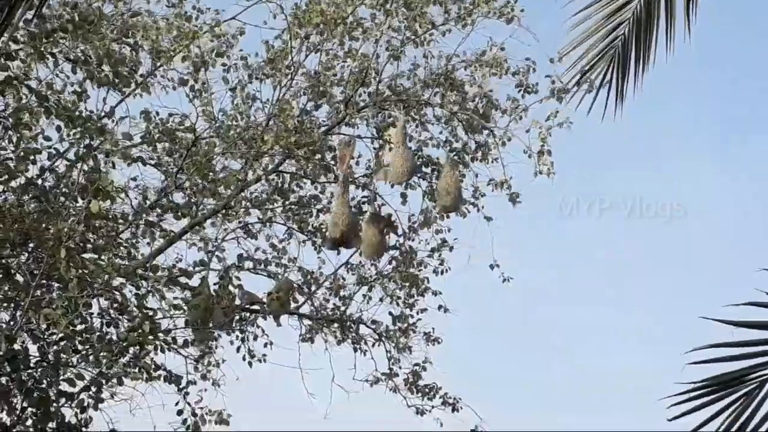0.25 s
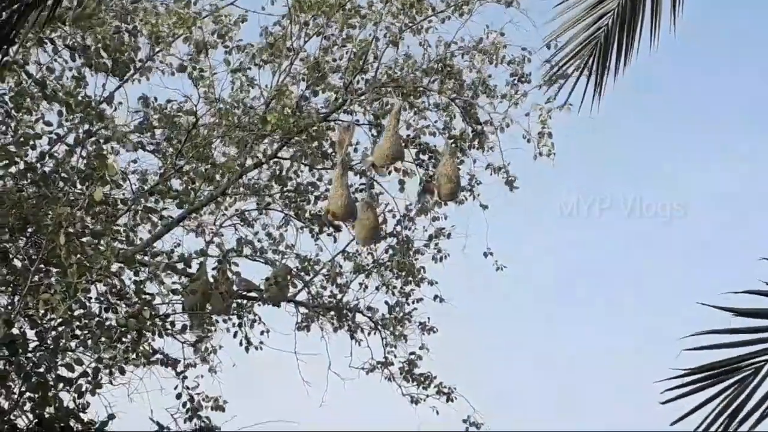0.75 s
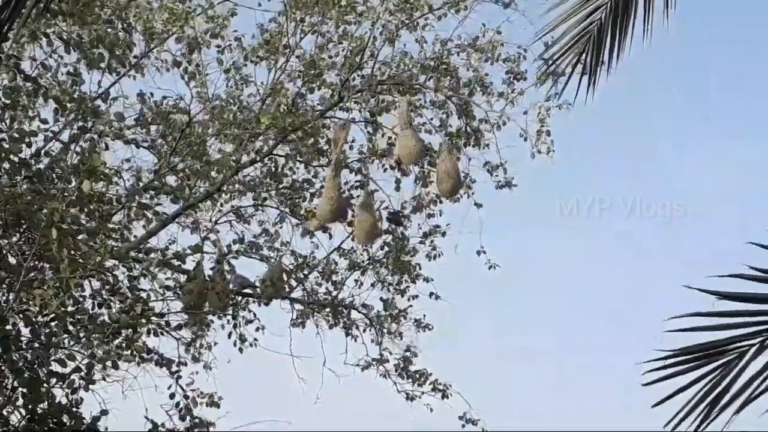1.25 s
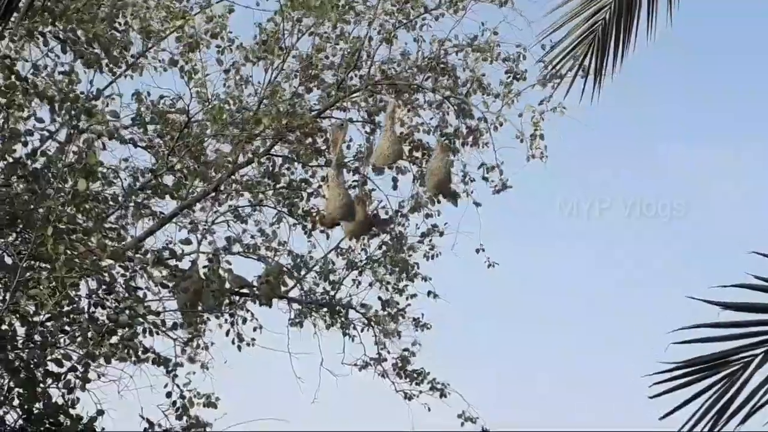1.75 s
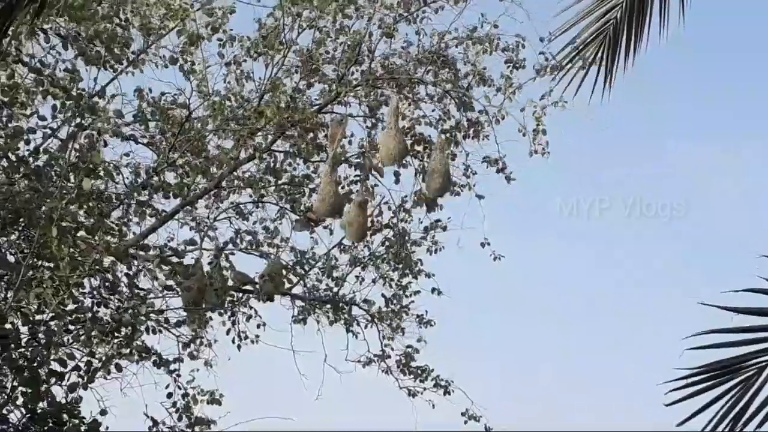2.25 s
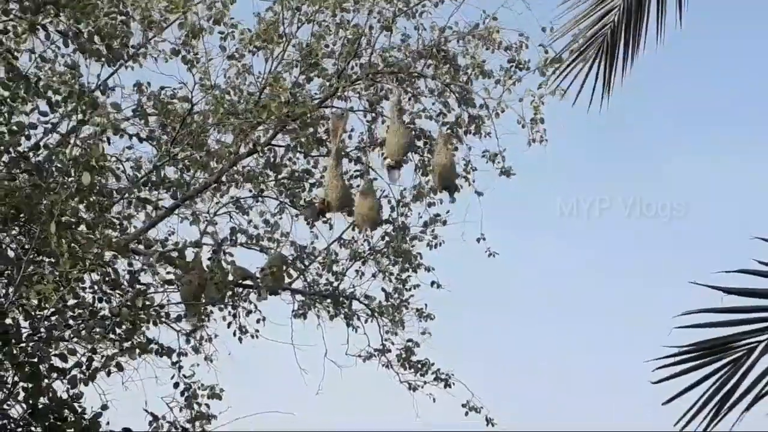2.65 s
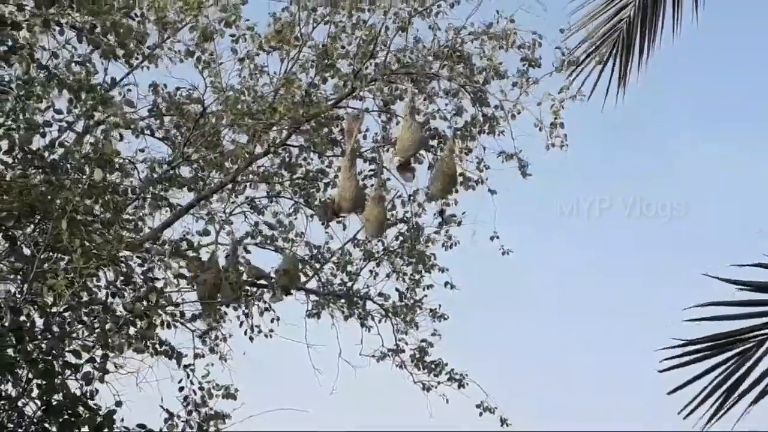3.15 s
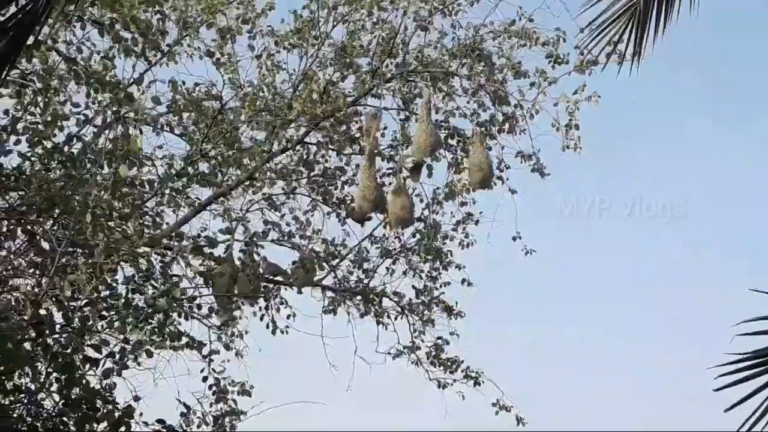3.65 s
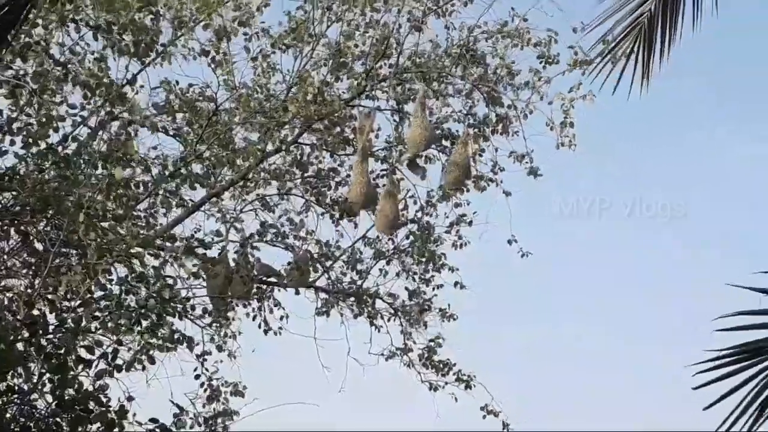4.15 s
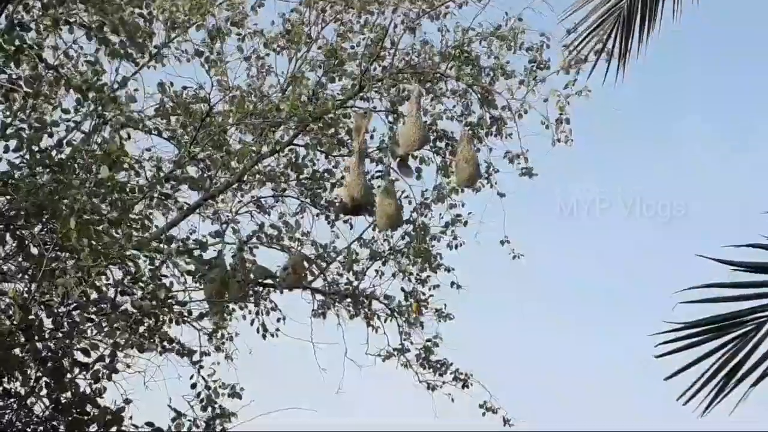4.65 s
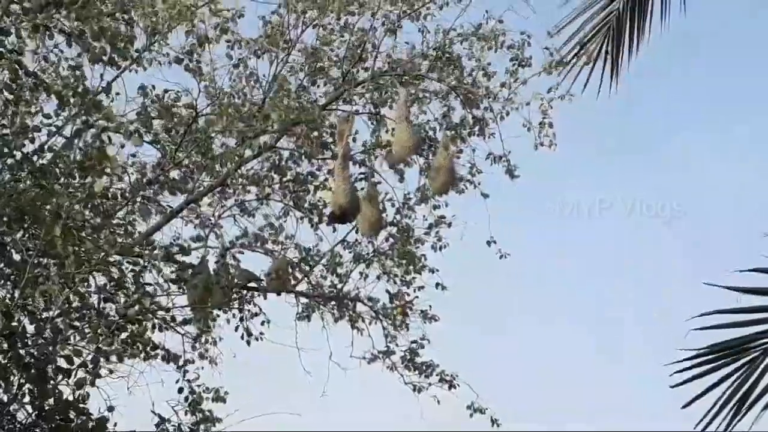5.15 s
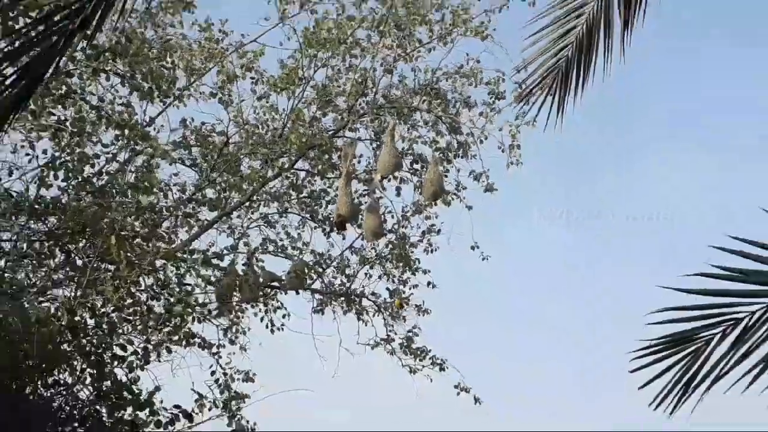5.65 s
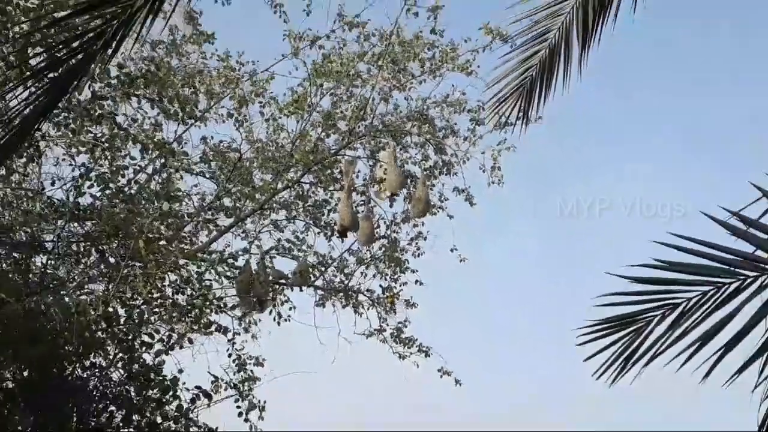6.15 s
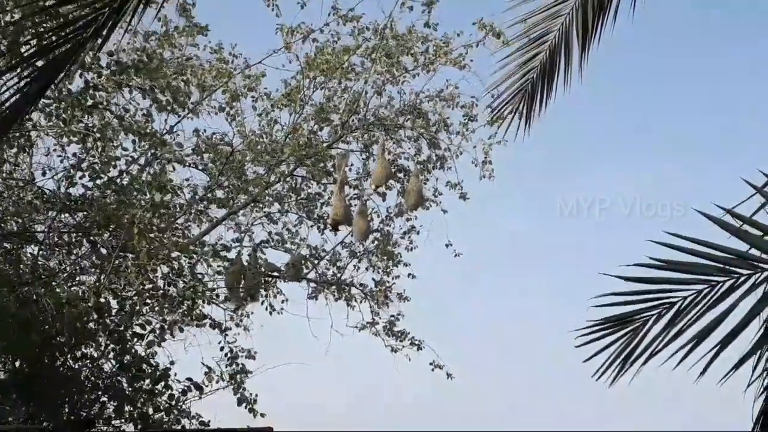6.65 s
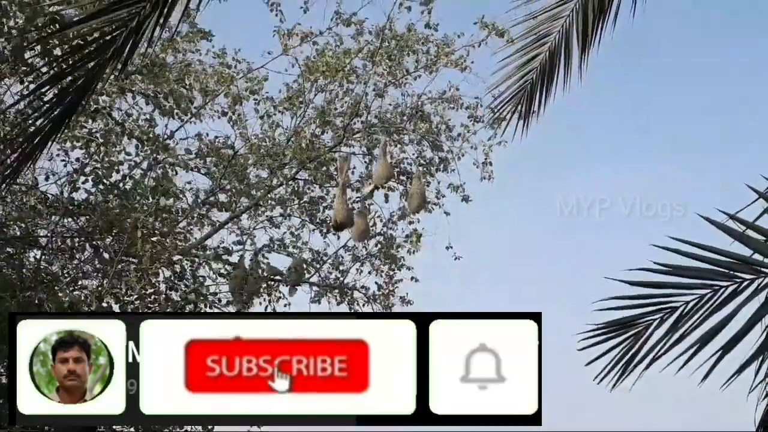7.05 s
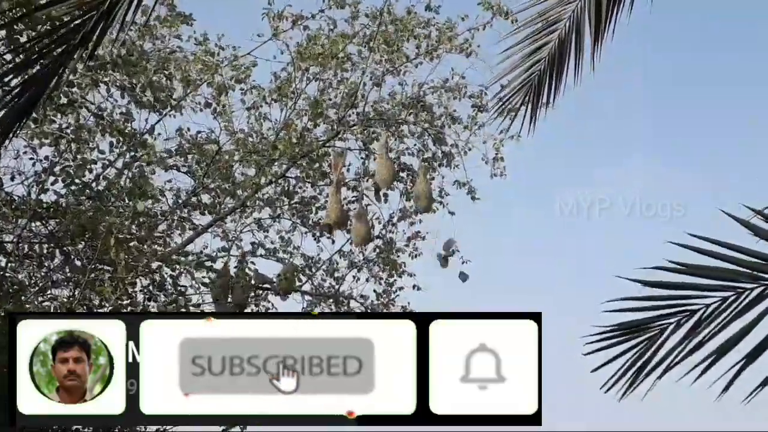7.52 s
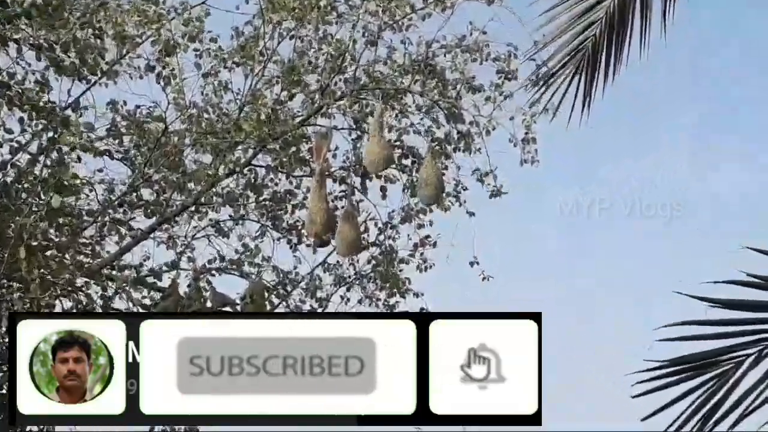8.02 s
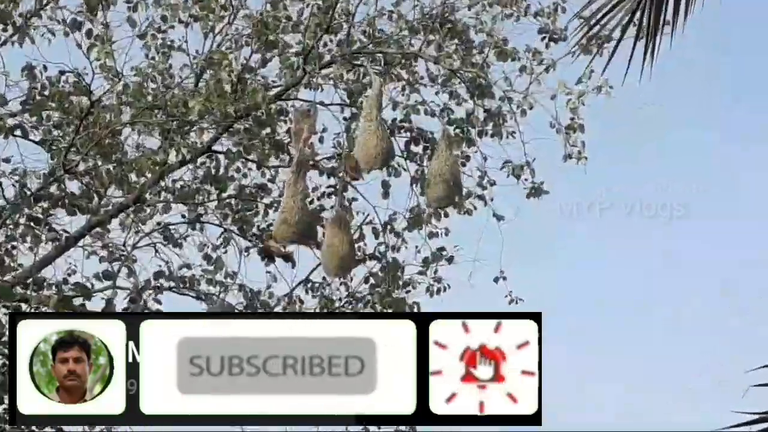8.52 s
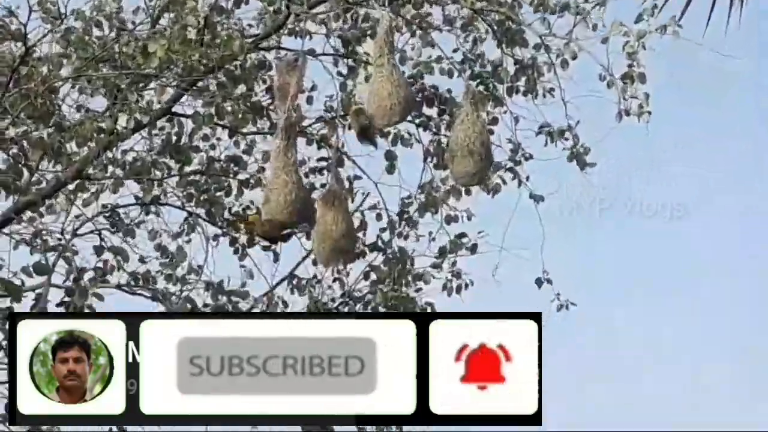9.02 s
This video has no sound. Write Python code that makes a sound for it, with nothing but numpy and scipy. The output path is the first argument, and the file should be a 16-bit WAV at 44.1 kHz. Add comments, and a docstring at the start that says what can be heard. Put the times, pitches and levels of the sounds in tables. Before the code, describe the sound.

A weaver bird colony chatters loudly and shrilly in its nest tree, with warbled trills sliding downward, while wind rumbles in gusts against the microphone.

```python
"""Weaver birds chatter in their nest tree, heard in mono: near birds repeat a warbled trill and a buzzy
downward slide over a crowd of overlapping notes, with rasps, early gusts, far toots and a chugging engine.
A long whistle falls near 4 s, the hardest gusts hit near 5 s, and a second whistle follows.
A thin buzz holds from about 6 s, a soft rush swells at 7 s, and four quick chips come near 8 s.
Bird notes are wobbling tones with leaf echoes, the rest is tones, shaped noise and pulses; loud peaks round off."""
import sys
import numpy as np
from scipy import signal
from scipy.fft import rfft, irfft
from scipy.io import wavfile
from scipy.ndimage import uniform_filter1d

SR = 44100
rng = np.random.default_rng(int(sys.argv[2]) if len(sys.argv) > 2 else 0)


def bounce(signal):
    """Save signal as a 16-bit WAV file at the path given by the first command-line argument."""
    frames = np.transpose(np.atleast_2d(signal))
    limited = np.clip(frames, -1, 1)
    pcm = np.round(limited * 32767).astype(np.int16)
    wavfile.write(sys.argv[1], SR, pcm)


N = 409248
TIME = np.arange(N) / SR

# song phrases, each a trill that runs into a downward slide; levels are before the trims in near_birds:
# turn_s (from trill to slide), trill_length_s, trill_pitch_hz, trill_level_db,
# slide_length_s, slide_top_hz, resting_hz, slide_level_db
PHRASES = [(0.127, 0.165, 4600, -7, 0.15, 6020, 3390, -14),
           (0.325, 0.045, 4500, -16, 0.15, 5680, 3112, -15),
           (0.439, 0.12, 4806, -7.5, 0.14, 6360, 3264, -14),
           (0.642, 0.15, 4530, -10.5, 0.091, 5700, 3244, -13),
           (0.779, 0.071, 4914, -11, 0.13, 5260, 3240, -15),
           (0.885, 0.17, 4624, -11, 0.13, 6120, 3210, -14.5),
           (1.207, 0.05, 4812, -12.5, .17, 5850, 3226, -13.5),
           (1.326, 0.15, 4610, -10.5, .11, 5830, 3115, -10.5),
           (1.564, 0.09, 4510, -11, .125, 5760, 3436, -10.5),
           (1.684, 0.1, 4920, -15.5, 0.17, 5660, 3118, -15.5),
           (1.759, 0.097, 4603, -7.5, 0.14, 6190, 3110, -12),
           (1.931, .11, 4600, -16, 0.15, 4880, 3420, -33),
           (2.088, 0.14, 4570, -10.5, 0.12, 5940, 3430, -12),
           (2.205, 0.13, 4710, -11, 0.14, 6430, 3180, -18),
           (2.64, 0.11, 4470, -19, 0.14, 5140, 3080, -15.5),
           (3.112, 0.028, 4724, -24, 0.13, 5020, 3135, -14),
           (3.274, 0.19, 4860, -9.5, 0.17, 6140, 3298, -10),
           (3.598, 0.13, 4690, -18, 0.13, 4810, 3190, -17.5),
           (3.797, 0.2, 4880, -13.5, 0.17, 4992, 3330, -19),
           (3.851, 0.075, 4530, -13.5, 0.18, 6060, 3440, -12.5),
           (4.32, 0.19, 4900, -16.5, .18, 5620, 3249, -14.5),
           (4.403, 0.1, 4560, -11.5, 0.193, 6070, 3494, -12.5),
           (4.533, 0.065, 4400, -25, 0.18, 5280, 3083, -17),
           (4.869, 0.093, 4700, -16.5, 0.14, 4970, 3250, -26),
           (5.015, 0.029, 4540, -37, 0.11, 4760, 3326, -15),
           (5.117, 0.11, 4746, -16, 0.067, 5160, 3340, -46),
           (5.299, .15, 4470, -19, .17, 5660, 3420, -15.5),
           (5.418, 0.0906, 4620, -18, 0.039, 4200, 3450, -34),
           (5.64, 0.11, 5100, -14.5, 0.055, 5270, 3250, -27),
           (5.818, 0.13, 4714, -11.5, 0.21, 5970, 3446, -12.5),
           (6.272, 0.17, 4850, -10, 0.17, 5630, 3240, -14), (6.74, 0.17, 4920, -8.5, 0.17, 6060, 3250, -13),
           (7.231, 0.17, 4850, -13, 0.17, 5850, 3214, -16),
           (7.752, 0.15, 4980, -15, 0.17, 6330, 3144, -14.5),
           (8.262, 0.15, 4760, -9.5, .18, 6010, 3260, -13.5),
           (8.474, 0.033, 4880, -17.5, .15, 5170, 3150, -17),
           (8.772, 0.14, 4750, -11, 0.16, 5690, 3297, -12),
           (8.967, 0.031, 4700, -37, 0.13, 4340, 3320, -23), (9.29, 0.18, 4860, -10.5, .15, 5850, 3300, -6)]
WARBLES_PER_S = 67  # typical number of pitch leaps a second in a trill


def undb(db):
    """Turn decibels into a plain loudness factor."""
    return 10 ** (np.asarray(db) / 20)


def unit(x):
    """Scale to rms 1, a standard average strength."""
    return x / np.sqrt(np.mean(x ** 2) + 1e-18)


def curves(table, t=TIME):
    """The columns of a table, joined by straight lines in time."""
    s, *columns = np.transpose(table)
    return [np.interp(t, s, c) for c in columns]


def colour(x, points):
    """Make each pitch range louder or softer, following (pitch_hz, level_db) points."""
    hz, db = np.transpose(points)
    f = np.maximum(np.fft.rfftfreq(len(x), 1 / SR), 1)
    gain = undb(np.interp(np.log(f), np.log(hz), db))
    return irfft(rfft(x) * gain, len(x))


def noise(points):
    """Coloured noise of rms 1."""
    return unit(colour(rng.standard_normal(N), points))


def wander(t, rate):
    """A random line with `rate` corners a second."""
    steps = rng.standard_normal(int(t[-1] * rate) + 2)
    return np.interp(t * rate, np.arange(len(steps)), steps)


def clock(length):
    """Sample times of one note, at least 10 ms of them."""
    return np.arange(int(max(length, .01) * SR)) / SR


def gate(t, rise, fall):
    """Soft start and end of a note, each lasting the given seconds."""
    edge = np.clip(np.minimum(t / rise, (t[-1] - t) / fall), 0, 1)
    return np.sin(np.pi / 2 * edge) ** 2


def add(out, s, x):
    """Mix a note in at time s."""
    i = int(s * SR)
    x = x[max(-i, 0):max(N - i, 0)]
    out[max(i, 0):max(i, 0) + len(x)] += x


def near_birds():
    """The males at the closest nests: each note is one sweep or wobble of a bird's voice."""
    # harsh rasps: start_s, length_s, level_db (before the trim below)
    rasp_table = [(0.557, 0.1, -21), (1.07, 0.15, -25), (1.33, .16, -20.5), (1.613, 0.13, -17.5),
                  (2.057, 0.11, -20), (2.198, 0.044, -14.5), (2.682, 0.051, -16.5), (2.913, 0.1, -20),
                  (3.474, 0.055, -26), (3.613, 0.055, -23), (4.248, 0.067, -22.5), (5.017, 0.069, -24),
                  (5.867, 0.065, -26), (6.215, 0.072, -16), (6.38, 0.067, -18), (6.554, 0.076, -8.5),
                  (6.7, 0.065, -7), (6.856, 0.071, -22.5), (7.001, 0.092, -20), (7.069, 0.043, -12),
                  (7.403, 0.082, -21.5), (7.558, 0.1, -24), (8.606, 0.056, -23), (8.951, 0.052, -22.5)]
    # falling slurs: start_s, length_s, first_hz, last_hz, level_db
    slur_table = [(2.478, 0.12, 5250, 3980, -16), (2.987, 0.1, 4560, 3580, -16.5),
                  (4.88, 0.12, 4720, 3740, -17), (5.851, 0.022, 2940, 2840, -24.5),
                  (6.719, 0.047, 3195, 2855, -19.5), (7.355, 0.027, 5010, 4500, -15.5),
                  (7.385, 0.027, 4960, 3510, -14.5), (7.406, 0.015, 5020, 3300, -21),
                  (7.996, 0.038, 7000, 6100, -21)]
    # short arched chips: top_s (roughly), top_hz, level_db (before the trim below)
    chip_table = [(7.932, 5610, -14), (7.982, 5600, -16), (8.05, 6110, -15), (8.099, 6020, -14)]
    # long whistles, one list of points for each: time_s, pitch_hz, level_db
    whistle_table = [
        [(3.85, 6890, -27), (3.89, 5510, -14.5), (3.93, 4860, -14), (4.0, 4340, -17), (4.06, 4260, -35),
         (4.085, 4180, -10.5), (4.13, 3560, -15), (4.19, 3284, -16.5), (4.25, 3130, -39)],
        [(5.25, 7240, -20), (5.28, 5775, -17.5), (5.33, 4820, -11), (5.4, 4270, -21.5), (5.48, 4110, -17),
         (5.53, 3756, -13.5), (5.59, 3410, -25), (5.69, 3145, -25.5), (5.76, 2950, -32)],
    ]
    lead_s, gap_s = .02, .0069  # a trill starts this early and stops this long before the turn
    out = np.zeros(N)
    for s, trill_s, hz, db, slide_s, top_hz, rest_hz, slide_db in PHRASES:
        rate = WARBLES_PER_S * (1 + .0511 * rng.standard_normal())
        add(out, s - trill_s - lead_s, trill(trill_s + lead_s - gap_s, hz, rate, db + 1.1))
        add(out, s - .02, slide(slide_s, top_hz, rest_hz, slide_db))
    for s, length, db in rasp_table:
        hz = 6150 - 19 * db  # softer rasps are shriller
        add(out, s, rasp(length, hz, db - 1))
    for s, *note in slur_table:
        add(out, s, slur(*note))
    for s, top_hz, db in chip_table:
        add(out, s - .034, chip(top_hz, db + .5))
    for rows in whistle_table:
        add(out, rows[0][0], whistle(rows))
    return out


def trill(length, hz, rate, db, depth_hz=1400, sag_hz=1050):
    """The pitch leaps up from a sinking base many times a second; leaps shrink and troughs are loudest."""
    t = clock(length)
    cycle = 2 * np.pi * np.cumsum(rate * (1 + .04 * wander(t, 50))) / SR
    leap = (.5 + .5 * np.cos(cycle)) ** 2
    tension = 1 - t / t[-1]
    pitch = hz + depth_hz * (leap - .2) * (.75 + .5 * tension) + sag_hz * (tension - .45)
    loudness = (1 - .38 * leap) * undb(db) * gate(t, .5 * length, .013)
    return twigs(syrinx(t, pitch, rough=.0139) * loudness, echo_db=-5.5, spread_s=.016)


def slide(length, top_hz, rest_hz, db, buzz_hz=135, buzz=0.29):
    """The pitch arches over its top, drops quickly, then sinks or levels off, with a light buzz."""
    t = clock(length + .0149)
    # 0: rests at 3435 Hz or above and levels off; 1: rests 210 Hz or more below that and keeps sinking
    sinking = np.clip((3435 - rest_hz) / 210, 0, 1)
    sink = .27 * sinking  # share of the pitch span left for the slow sinking
    drop = np.exp((.008 - np.hypot(t - .018, .008)) / .029)  # rounded top at 18 ms
    tension = (1 - sink) * drop + sink * (1 - t / t[-1])
    hz = rest_hz + (top_hz - rest_hz) * tension
    flutter = np.sin(2 * np.pi * np.cumsum(buzz_hz * (1 + .13 * wander(t, 68.1))) / SR)
    # sinking slides lose 8 dB on the way; level ones gain 3.5 dB
    fade_db = (8 * sinking - 3.5 * (1 - sinking)) * (.5 - t / t[-1])
    tone = syrinx(t, hz * (1 + .036 * flutter * (.5 + tension)), rough=.024 * (.7 + tension))
    return twigs(tone * (1 + buzz * flutter) * undb(db + fade_db) * gate(t, .026, .005), echo_db=-4.5)


def rasp(length, hz, db, pulses_per_s=170):
    """A rattling note: the pitch is thrown about very fast and the sound comes in uneven pulses."""
    t = clock(length)
    pulse_phase = 2 * np.pi * np.cumsum(pulses_per_s * (1 + .3 * wander(t, 100))) / SR
    rattle = 1 + .55 * np.sin(pulse_phase)
    tone = syrinx(t, hz * (1 + .12 * wander(t, 450)), rough=.1)
    return twigs(tone * rattle * undb(db) * gate(t, .015, .033), echo_db=-.5)


def slur(length, first_hz, last_hz, db):
    """A note that sinks evenly, with a hoarse quaver."""
    t = clock(length)
    quaver = 1 + .05 * np.sin(2 * np.pi * WARBLES_PER_S * t) + .025 * wander(t, 300)
    hz = (first_hz + (last_hz - first_hz) * t / length) * quaver
    return twigs(syrinx(t, hz, rough=.022) * undb(db) * gate(t, .011, .0055))


def chip(top_hz, db, length=0.061, trough_hz=3750):
    """The pitch arches up and down, hoarse and loud at the top, clearer and softer at both ends."""
    t = clock(length)
    arch = np.exp(-((t - length / 2) / (.012 * rng.uniform(.8, 1.25))) ** 2)
    hz = (trough_hz + (top_hz - trough_hz) * arch) * (1 + .0386 * arch * wander(t, 605))
    tone = syrinx(t, hz, rough=.015 + .04 * arch)
    return twigs(tone * undb(db - 6 * (1 - arch)) * gate(t, .01, .01), spread_s=.008)


def whistle(rows):
    """A long tone whose pitch and level run through a list of points."""
    start_s, end_s = rows[0][0], rows[-1][0]
    t = clock(end_s - start_s)
    hz, db = curves(rows, start_s + t)
    return twigs(syrinx(t, hz, rough=.011) * undb(db) * gate(t, .015, .0089))


def syrinx(t, hz, rough, overtone_db=-28, third_db=-42):
    """A bird's voice: a nearly pure tone with an unsteady pitch and two weak overtones."""
    phase = 2 * np.pi * np.cumsum(hz * (1 + rough * wander(t, 1500))) / SR
    overtones = undb(overtone_db) * np.sin(2 * phase) + undb(third_db) * np.sin(3 * phase)
    return np.sqrt(2) * (np.sin(phase) + overtones)


def twigs(x, echo_db=-6, spread_s=0.024, count=14):
    """Branches and nests return a handful of early echoes, drawn afresh for each sound."""
    lags = (rng.uniform(.05, 1, count) * spread_s * SR).astype(int)
    gains = undb(echo_db) * rng.standard_normal(count) / np.sqrt(count)
    out = np.pad(x, (0, lags.max()))
    for lag, gain in zip(lags, gains):
        out[lag:lag + len(x)] += gain * x
    return out


def foliage(x, wet_db=-12, t60=0.38):
    """Leaves scatter a short diffuse tail, which fades by 60 dB in t60 seconds."""
    t = clock(.5)
    tail = rng.standard_normal(len(t)) * undb(-60 * t / t60)
    return x + undb(wet_db) * signal.fftconvolve(x, tail / np.linalg.norm(tail))[:N]


def colony(chatter_db=-4.0, sizzle_db=-15.0, count=150):
    """Birds deeper in the crown overlap the same notes; shrill trills and rasps add a sizzle on top."""
    # tone colour of the crowd: pitch_hz, level_db
    crowd_colour = [(1500, -30), (2500, 13), (3000, 13.5), (3400, 9), (3900, 1), (4700, 2), (6500, 0.5),
                    (8000, 14), (9500, 2.5), (15000, 2)]
    song, harsh = np.zeros(N), np.zeros(N)
    for k, (when, size, pace, loud) in enumerate(rng.uniform(-1, 1, (count, 4))):
        s = (k + when / 2) / count * (N / SR + .1) - .1
        pitch, db = 1 + .12 * size, 4.7 * loud
        rate = WARBLES_PER_S * (1 + .3 * pace)
        add(song, s, trill(.12, 4800 * pitch, rate, db + .5))
        if k % 2:
            add(song, s, slide(.15, 5800 * pitch, 3230, db - 11))
        else:
            add(song, s, chip(5700 / pitch, db - 4.5))
        add(song, s, rasp(.097, 4900 * pitch, db - 4))
        add(harsh, s, trill(.1, 7000 / pitch, rate, -db))
        add(harsh, s + .036, rasp(.06, 7500 * pitch, 5 * pace - 3))
    harsh = colour(harsh, [(4000, -27), (6000, 13.5), (7000, 6.0), (8600, 10.5), (9900, -2)])
    chatter = unit(colour(song, crowd_colour)) * undb(chatter_db)
    crowd = chatter + unit(harsh) * undb(sizzle_db)
    # echoes shared by the whole crown strengthen some pitches and weaken others
    return twigs(crowd, echo_db=-7, spread_s=.012)[:N] * undb(excitement())


def excitement():
    """Colony level in dB: it drifts, comes in bursts, joins in with near trills and dies away in lulls."""
    # slow drift of the colony: time_s, level_db
    drift = [(0, -14), (.7, -16.5), (1.3, -14), (1.9, -19), (2.4, -11.5), (3.4, -16), (4.3, -15),
             (5.2, -19.5), (6.1, -20.5), (6.7, -19.5), (7, -18.5), (7.6, -13.5), (8.2, -17), (9.28, -17)]
    # lulls: restart_s (back to full level), length_s, depth_db
    lulls = [(2.88, 0.13, 20.5), (3.098, 0.08, 6.5), (4.155, 0.31, 32), (4.785, 0.23, 16.5),
             (5.509, 0.11, 30.5), (7.543, 0.096, 7), (8.952, 0.075, 16)]
    join_db, join_s = 3, .2  # rise per two standard deviations of trill level; averaging time
    die_away_s, restart_s = .044, .035
    singing = np.zeros(N)
    for s, trill_s, _, db, *_ in PHRASES:
        add(singing, s - trill_s, np.full(len(clock(trill_s)), undb(db)))
    singing = uniform_filter1d(singing, int(join_s * SR) + 1)
    hush = np.zeros(N)
    for s, length, depth_db in lulls:
        edge = np.minimum((TIME - s + length) / die_away_s, (s - TIME) / restart_s)
        hush += depth_db * np.clip(edge, 0, 1)
    bursts = 1.5 * wander(TIME, 11)
    return curves(drift)[0] + join_db * singing / singing.std() / 2 + bursts - hush


def hoarseness(song, hiss_db=-22, flicker_db=3.0):
    """A hiss pulses with every syllable that leaps high, and its level flickers."""
    high = colour(song, [(3800, -59), (5600, 6.0)])
    syllables = np.sqrt(uniform_filter1d(high ** 2, size=50) + 1e-12)
    hiss = noise([(2500, -32), (5000, -7), (7000, 3.5), (10000, -0.5), (15000, -6)])
    return hiss * syllables * undb(hiss_db + flicker_db * wander(TIME, 13))


def far_chatter(db=-29):
    """The farthest birds blur into a dull wash of noise that comes and goes with the colony."""
    surge = 5 * wander(TIME, 7)
    wash = noise([(700, -24), (1300, -13), (2400, 1), (4000, -10.5)])
    return wash * undb(db + excitement() + surge)


def drone(db=-19):
    """Narrow bands of noise make a thin steady buzz that holds for nearly a second under the calls."""
    # tone colour of the buzz: pitch_hz, level_db
    buzz_colour = [(3600, -62), (3980, -8), (4150, 12.5), (4330, -1.5), (4650, -5), (5300, 6), (6200, -14),
                   (11000, -42), (12300, -17), (13500, -35)]
    swell_db, = curves([(5.92, -66.5), (5.97, 1), (6.66, 4), (6.76, -54.5)])
    return noise(buzz_colour) * undb(db + swell_db)


def snaps(t60=0.18):
    """Soft, dry snaps in the branches: short bursts of noise that fade quickly."""
    # snaps: start_s, level_db
    snap_table = [(3.888, -15.5), (6.158, -19.5), (8.234, -21.5)]
    # tone colour of a snap: pitch_hz, level_db
    snap_colour = [(500, -18), (1400, -14), (2200, -9), (2900, -10.5), (4500, 0), (9000, -31)]
    level, t = np.zeros(N), clock(.2)
    for s, db in snap_table:
        add(level, s, undb(db - 60 * t / t60) * gate(t, .0042, .02))
    return level * noise(snap_colour)


def wind(breeze_db=-39, full_db=-9):
    """Eddies buffet the microphone; the stronger a gust, the more it tears at higher pitches."""
    # gusts: start_s, length_s, crest_level_db (before the rumble is limited)
    gust_table = [(0, 0.016, -12.5), (0.062, 0.078, -9.5), (0.258, 0.24, -27), (0.701, 0.02, -21.5),
                  (0.744, 0.094, -16.5), (0.862, 0.038, -13), (0.966, 0.1, -11), (1.082, 0.037, -10.5),
                  (1.163, 0.028, -19.5), (1.731, 0.046, -10.5), (1.783, 0.089, -27), (2.08, 0.062, -19),
                  (2.156, 0.067, -7.5), (2.691, 0.0054, -21), (2.79, 0.017, -22.5), (3.24, 0.11, -19),
                  (3.421, 0.092, -6.5), (3.581, 0.14, -8), (3.685, 0.077, -10.5), (3.794, 0.082, -18),
                  (3.898, 0.084, -20.5), (4.349, 0.22, -15), (4.861, 0.024, -9), (4.909, 0.14, -6.5),
                  (5.044, 0.14, 0), (5.189, 0.061, -3), (5.255, 0.041, -9.5), (5.392, 0.014, -21.5),
                  (6.475, 0.065, -24), (7.44, 0.066, -34)]
    # tone colour of the deep rumble: pitch_hz, level_db
    rumble_colour = [(20, -52), (45, -13), (75, -2), (130, 3), (220, -3), (350, -16.5), (550, -32.5),
                     (900, -82)]
    gust = np.zeros(N)
    for s, length, db in gust_table:
        add(gust, s - .01, gust_shape(length, db))
    breeze = undb(breeze_db + 4.5 * wander(TIME, 22)) * np.interp(TIME, [5.3, 5.7], [1, 0])
    rumble = undb(full_db) * np.tanh(gust / undb(full_db))  # stops growing in the hardest gusts
    deep = (rumble + breeze) * noise(rumble_colour)
    tearing = noise([(100, -16), (280, 10.0), (600, -6.5), (1100, -29.5), (3000, -58)])
    torn = gust ** 2 * tearing * undb(3.2 * wander(TIME, 130))
    return (deep + torn) * undb(2.5 * wander(TIME, 90))


def gust_shape(length, db):
    """A gust climbs 11 dB to its crest, eases by 10 dB and dies away."""
    t = clock(length + .03)
    swell_db = np.interp(t / t[-1], [0, .55, 1], [-11, 0, -10])
    return undb(db + swell_db) * gate(t, .01, .026)


def far_calls(count=4):
    """Low hoarse calls and horn-like toots from a distance, with strong echo; each arches a little in pitch."""
    # far calls and toots: start_s, length_s, pitch_hz, glide_octaves, level_db (before the factor 1.3),
    # tilt_db (level change per overtone)
    call_table = [(0.014, 0.18, 484, -0.041, -43, 1), (1.03, 0.16, 590, 0.051, -45.5, -11),
                  (3.241, 0.16, 509, 0.17, -40, -24), (3.774, 0.17, 1090, -0.21, -43, -12),
                  (4.245, 0.17, 915, -0.099, -48.5, -10), (5.245, 0.096, 1043, -0.093, -41, -12),
                  (5.784, .16, 895, -.07, -52, -22), (6.276, 0.2, 484, 0.032, -52.5, 2.5),
                  (8.792, 0.15, 1024, 0.098, -50.5, 7.5), (9.114, 0.14, 613, 0.15, -42.5, -14)]
    out = np.zeros(N)
    for s, length, hz, glide, db, tilt_db in call_table:
        t = clock(length)
        waver = 1 + .025 * (np.sin(np.pi * t / length) - .7) + .03 * wander(t, 390)
        phase = 2 * np.pi * np.cumsum(hz * 2 ** (glide * t / length) * waver) / SR
        tone = sum(undb(tilt_db * k) * np.sin((k + 1) * phase) for k in range(count))
        add(out, s, tone * 1.3 * undb(db) * gate(t, .015, .072))
    return foliage(out, wet_db=0, t60=.3)


def engine(chugs_per_s=12, chug_db=-43.5, hum_db=-53.5):
    """A small engine far away: slightly uneven pulses make the chug, a narrow band of noise the hum."""
    # tone colours of the chug and of the hum: pitch_hz, level_db
    chug_colour = [(50, -35), (95, -26), (120, 9), (145, -10), (200, -24), (500, -52)]
    hum_colour = [(200, -59), (335, -16), (362, -9), (390, -37), (700, -53)]
    turns = np.floor(chugs_per_s * (TIME + .003 * wander(TIME, 5)))
    pulses = np.diff(turns, prepend=0) > 0
    chug = unit(colour(pulses * undb(2.0 * wander(TIME, 6.9)), chug_colour))
    return chug * undb(chug_db) + noise(hum_colour) * undb(hum_db)


def background(air_db=-38.5):
    """Faint outdoor air as coloured noise; a soft rush swells late on."""
    # tone colour of the air: pitch_hz, level_db
    air_colour = [(25, -27), (70, -5), (120, 1), (170, -18.5), (280, -14.5), (365, -10.5), (520, -17.5),
                  (1200, -32), (2500, -25.5), (15000, -32.5)]
    rush_db, = curves([(6.8, -76), (7.05, -32.5), (7.7, -37), (8.4, -45)])
    rush = noise([(80, -13.0), (280, -7.0), (600, -7.5), (1200, -18.5), (2500, -10.5), (8000, -18.0)])
    return noise(air_colour) * undb(air_db + wander(TIME, 1.8)) + rush * undb(rush_db)


def scene():
    """Mix all the sources, the same in both channels."""
    # small throats give nothing low
    song = colour(near_birds() + colony(), [(1600, -13), (2600, -2.5), (3100, -0.5)])
    tree = foliage(song + hoarseness(song) + drone() + snaps())
    mono = tree + far_calls() + far_chatter() + wind() + engine() + background()
    return np.array([mono, mono])


def record(dry, knee=6, top_hz=15700):
    """A hot mono input rounds off the peaks at full scale; then everything above top_hz is cut."""
    clipped = dry / (1 + np.abs(dry) ** knee) ** (1 / knee)
    return signal.sosfilt(signal.ellip(10, .1, 70, top_hz, fs=SR, output="sos"), clipped)


dry = scene()
out = record(dry)
bounce(out)
```